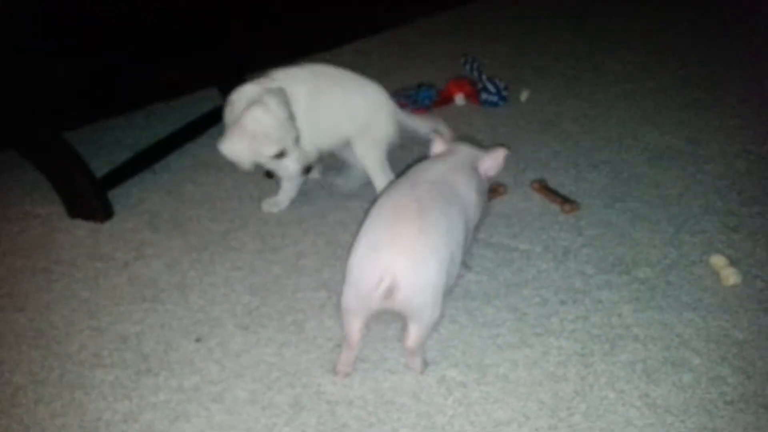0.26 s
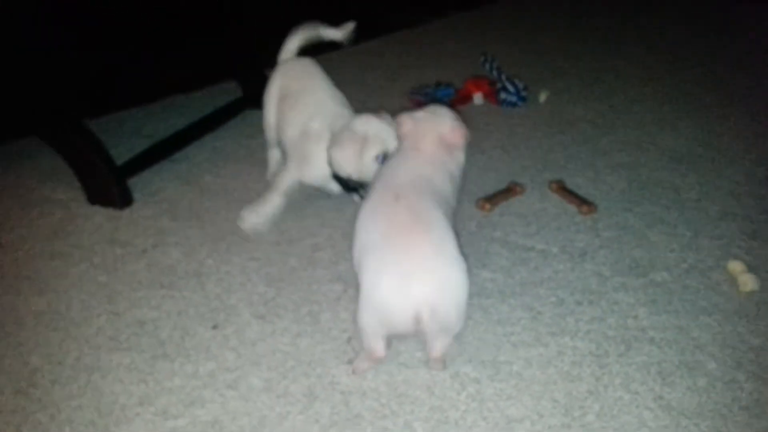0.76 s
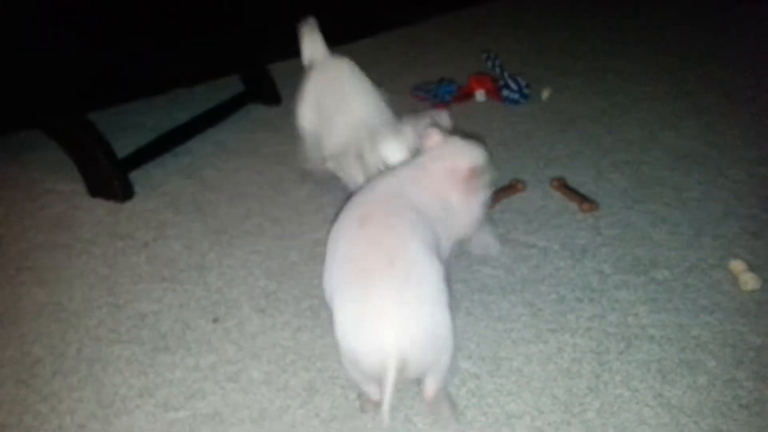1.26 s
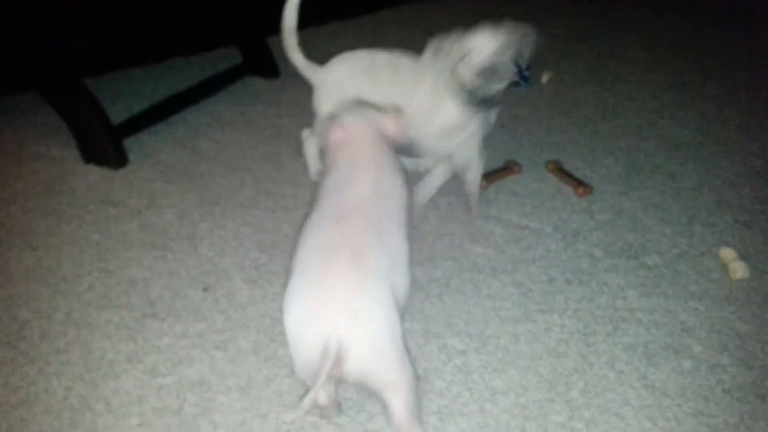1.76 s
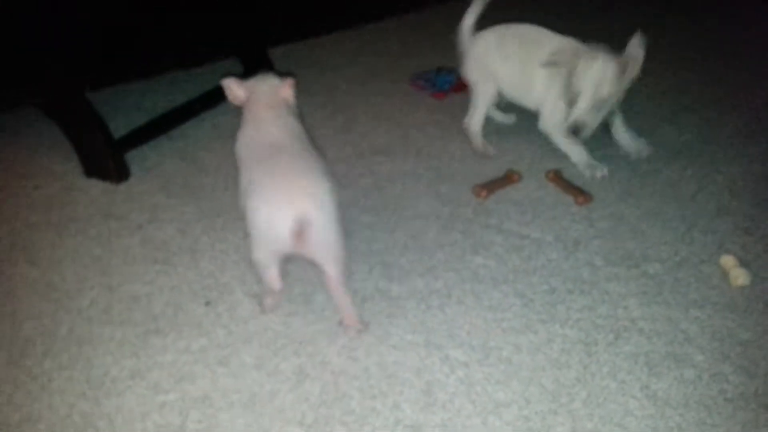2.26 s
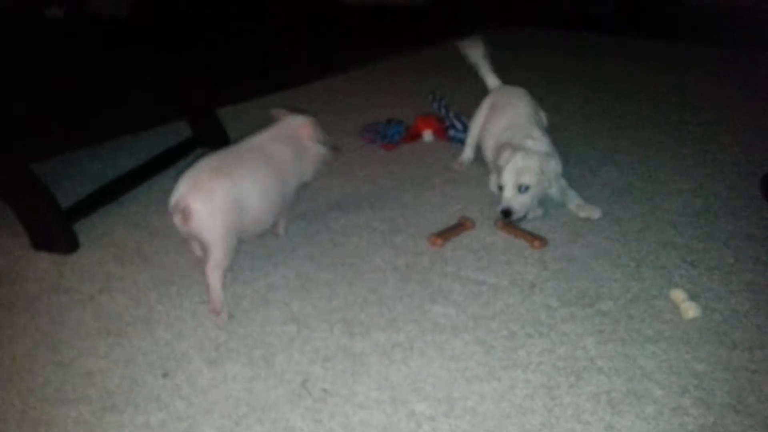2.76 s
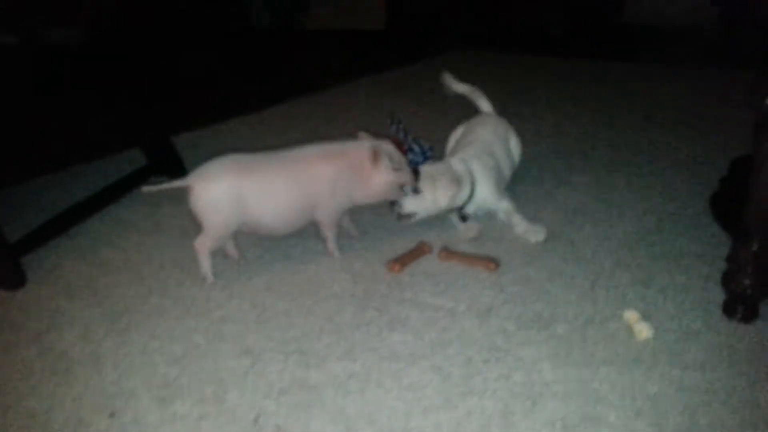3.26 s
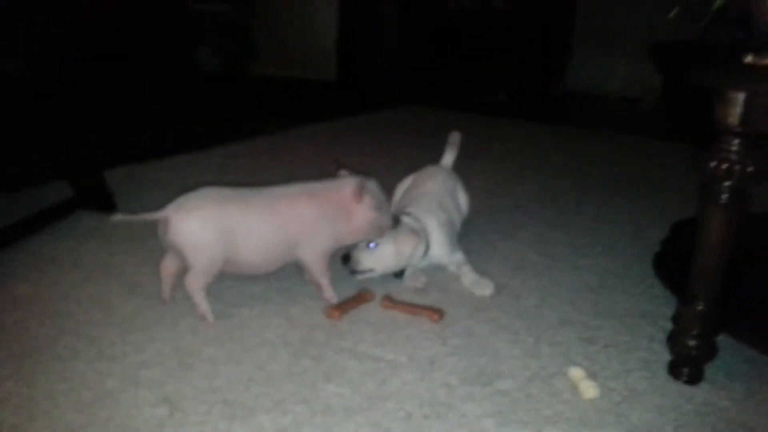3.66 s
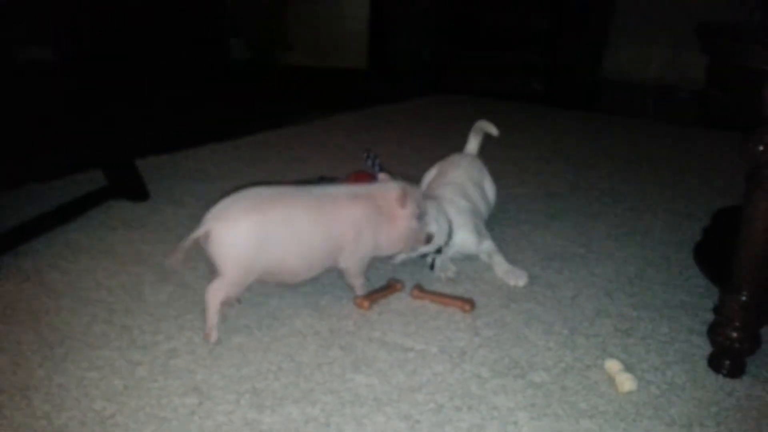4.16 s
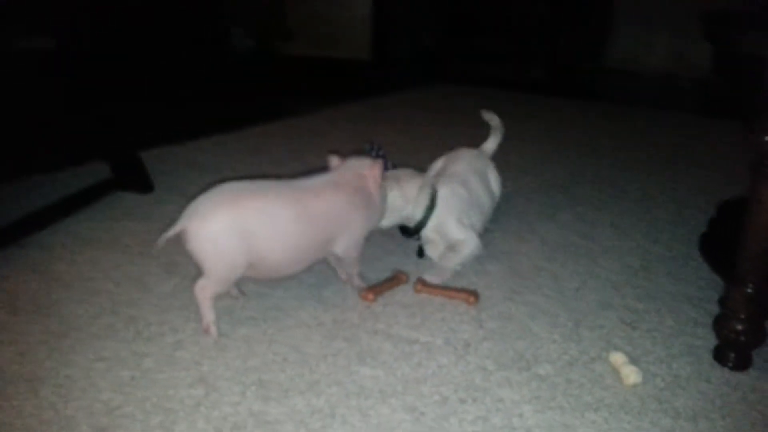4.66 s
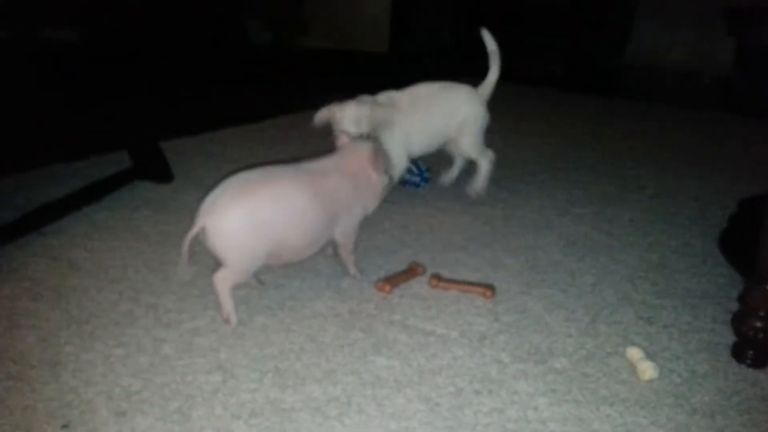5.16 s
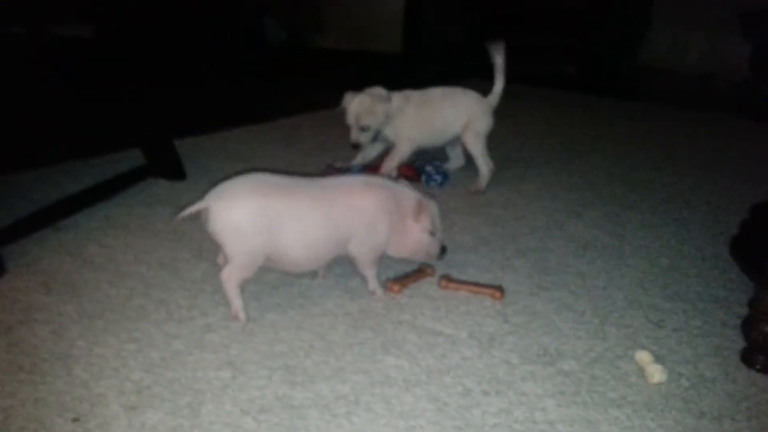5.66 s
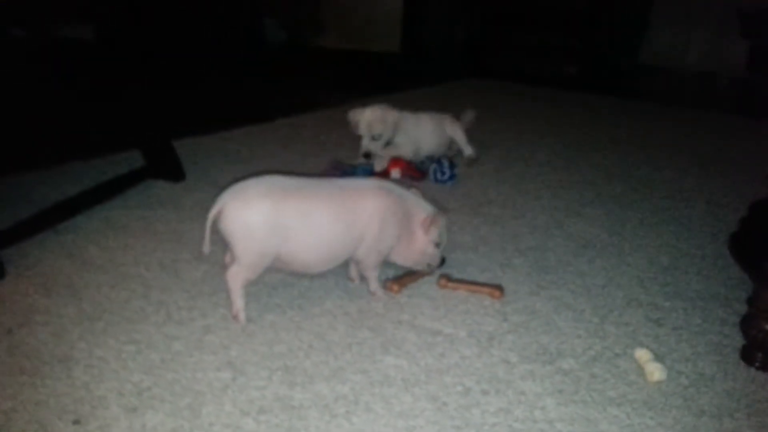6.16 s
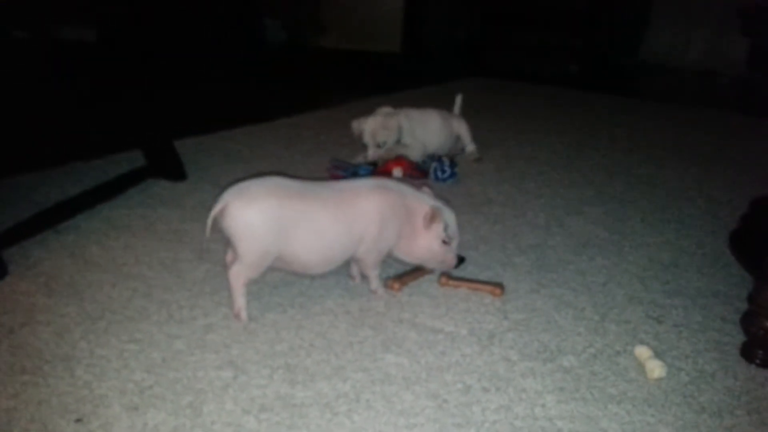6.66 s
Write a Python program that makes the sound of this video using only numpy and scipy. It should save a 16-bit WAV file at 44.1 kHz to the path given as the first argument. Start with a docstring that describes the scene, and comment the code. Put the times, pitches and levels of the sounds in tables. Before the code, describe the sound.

Small metal collar tags jingle in quick bright bursts, mostly on the right, over soft paw thuds and carpet rustle in a quiet room.

```python
"""Jingling tags in an animal scuffle

A piglet and a puppy scuffle on a carpet in a quiet living room.
Metal tags jingle in bursts to the right: decaying modes, chattering touches and noisy scraping.
Paws, fur and carpet are shaped noise; trotters and bumps of the hand-held camera ring low modes.
Light clicks and a few dry snaps are short noise bursts; an appliance hums as a wavering sine.
"""
import sys
import numpy as np
from scipy import signal
from scipy.fft import rfft, irfft, next_fast_len
from scipy.io import wavfile
from scipy.ndimage import uniform_filter1d, map_coordinates

SR = 44100
rng = np.random.default_rng(int(sys.argv[2]) if len(sys.argv) > 2 else 0)


def inscribe(sig):
    """Save sig as 16-bit PCM at rate SR to the path in sys.argv[1].

    A 1-D sig is mono; a 2-D sig holds one channel per row.
    Samples are clipped to [-1, 1] before scaling.
    """
    pcm = np.round(np.clip(np.atleast_2d(sig).T, -1, 1) * 32767)
    wavfile.write(sys.argv[1], SR, pcm.astype(np.int16))


N = 304334

# Hard contacts of the tags; the spot struck decides which modes ring. Levels precede the source gains:
# (time [s], main tone level [dB], tick level [dB], middle overtone level [dB], top overtone level [dB])
TAG_CONTACTS = [(0.0245, -50.5, -56, -61, -63), (0.513, -40.5, -47.5, -49, -54),
                (0.608, -37.5, -61, -62, -50), (0.6225, -26.5, -52, -59, -42), (0.642, -39, -56, -60, -56),
                (0.661, -40, -66, -62, -58), (0.7265, -40.5, -57, -53, -61), (0.8235, -42, -53.5, -52, -66),
                (0.872, -43, -59, -56, -52), (0.885, -43, -44, -46, -60.5), (0.898, -57, -44.5, -49, -61.5),
                (0.9519, -44, -51.5, -52, -65), (0.9825, -45, -56.5, -54, -55), (1.111, -45, -61, -63, -72),
                (1.1946, -34.5, -44, -63, -67), (1.27, -38, -53, -61, -62), (1.327, -32, -41.5, -46, -35.5),
                (1.36, -39, -55, -58, -43), (1.407, -34, -58, -60, -60), (1.417, -34, -38.5, -53, -41),
                (1.432, -41, -46, -55, -44), (1.6276, -62, -51.5, -67, -66), (1.681, -48, -58.5, -59, -65),
                (1.75, -36.5, -52, -62, -56), (1.773, -44, -43.5, -43.5, -43),
                (1.861, -28, -34, -28.5, -43), (1.8768, -27, -50, -38, -48),
                (1.919, -32.5, -49.5, -42, -53), (1.942, -36, -46, -49, -57),
                (2.0089, -34.5, -51.5, -58, -60.5), (2.035, -35.5, -58.5, -60, -47.5),
                (2.191, -40.5, -60.5, -66.5, -63), (2.245, -44, -57.5, -46.5, -58),
                (2.256, -38.5, -46, -51, -52), (2.283, -38.5, -52, -54, -51.5),
                (2.313, -18.5, -43, -50.5, -43.5), (2.3264, -23.5, -42.5, -48, -36),
                (2.342, -29, -52, -41, -39.5), (2.374, -20, -51.5, -45, -52.5),
                (2.3969, -24, -37, -37, -32.5), (2.4041, -22.5, -37, -41, -34.5),
                (2.428, -40.5, -51, -42, -55.5), (2.447, -26, -49, -37, -45),
                (2.4802, -25, -53.5, -45, -60), (2.6378, -50, -48.5, -66, -67),
                (2.7252, -48, -56, -64, -66), (3.192, -43, -60, -54.5, -58),
                (4.4703, -44.5, -63.5, -56, -57), (5.045, -30, -60, -48, -51),
                (5.055, -30.5, -46.5, -46, -54), (5.085, -42, -60, -55, -51),
                (5.112, -37.5, -66.5, -59, -57), (5.175, -42, -61, -59, -68),
                (5.285, -41.5, -58.5, -48, -68), (5.5058, -30, -50, -48, -46), (5.537, -24, -59, -44, -47),
                (5.638, -36, -51, -44, -61), (5.774, -36.5, -72, -52, -62), (5.9742, -56, -62.5, -61, -70)]


def amp(db):
    """Amplitude gain is ten to the power of decibels over twenty."""
    return 10 ** (np.asarray(db) / 20)


def unit(x):
    """Normalisation: division by the root mean square gives rms 1."""
    return x / np.sqrt(np.mean(x ** 2) + 1e-20)


def along(points, hz):
    """Linear interpolation of (Hz, value) points on a logarithmic frequency axis."""
    f, v = np.transpose(points)
    return np.interp(np.log(hz + 1), np.log(f + 1), v)


def wobble(rate):
    """Slow random modulation: a spline through random knots, rate of them a second."""
    knots = rng.standard_normal(int(N * rate / SR) + 4)
    return map_coordinates(knots, [np.arange(N) * rate / SR])


def filtered(x, response):
    """Linear filtering: the spectrum is multiplied by a response of frequency."""
    n = x.shape[-1]
    m = next_fast_len(n + 4096)
    return irfft(rfft(x, m) * response(np.fft.rfftfreq(m, 1 / SR)), m)[..., :n]


def noise(spectrum, shape):
    """Coloured noise: white noise through a spectral envelope, scaled to rms 1."""
    white = rng.standard_normal(shape)
    return unit(filtered(white, lambda hz: amp(along(spectrum, hz))))


def spread(pair):
    """Interchannel coherence: two unrelated signals mix to left and right, most alike in the bass."""
    # left-right likeness of the room's sound: (frequency [Hz], coherence [0-1])
    coherence = [(40, 0.75), (130, 0.97), (300, 0.89), (700, 0.23), (1500, 0.073), (8000, 0.22)]

    def mid_side_gains(hz):
        angle = np.arccos(np.clip(along(coherence, hz), -1, 1)) / 2
        return np.array([np.cos(angle), np.sin(angle)])

    mid, side = filtered(pair, mid_side_gains)
    return np.array([mid + side, mid - side])


def add(track, s, sound):
    """Superposition: a sound is summed into a track from time s."""
    part = track[..., max(round(s * SR), 0):][..., :sound.shape[-1]]
    part += sound[..., :part.shape[-1]]


def bursts(hits, spectrum, attack, t60):
    """Transient excitation: each (s, dB) hit is a stereo noise burst with exponential onset and decay."""
    out, t = np.zeros((2, N)), np.arange(SR // 4) / SR
    envelope = (1 - np.exp(-t / attack)) * amp(-60 * t / t60)
    envelope_rms = np.sqrt(np.mean(envelope ** 2)) / envelope.max()
    for s, db in hits:
        burst = unit(noise(spectrum, (2, len(t))) * envelope) * envelope_rms
        add(out, s, amp(db) * burst)
    return spread(out)


def knocks(hits, modes, attack):
    """Modal response: a soft blow, (s, dB), excites a few decaying low modes."""
    out, t = np.zeros(N), np.arange(SR // 5) / SR
    ringing = sum(amp(db - 60 * t / t60) * np.sin(2 * np.pi * hz * t) for hz, db, t60 in modes)
    knock = ringing * (1 - np.exp(-t / attack))
    for s, db in hits:
        add(out, s, amp(db) * knock)
    return out


def patchy(x, depth_db, size=7):
    """Spectral fluctuation: the colour of a rubbing sound shifts from one contact to the next."""
    z = signal.stft(x, nperseg=256)[2]
    across_frequency = uniform_filter1d(rng.standard_normal(z.shape), size, 0)
    field = uniform_filter1d(across_frequency, size, 1)
    return unit(signal.istft(z * amp(depth_db * unit(field)), nperseg=256)[1][:N])


def boom(x):
    """Room resonance: parallel band-pass modes add to the direct low sound."""
    # low resonances of the room: (centre [Hz], width [Hz], peak of the added band [dB re direct])
    resonances = [(122.4, 21.3, 0.5), (220.4, 6.8, 5.5), (261.7, 7.01, 1.5), (327, 17, -4)]

    def response(hz):
        return 1 + sum(amp(db) * 1j * hz * width / (centre ** 2 - hz ** 2 + 1j * hz * width)
                       for centre, width, db in resonances)

    return filtered(x, response)


def room(x, count=23):
    """Reverberation: convolution with decaying noise; the tails crossfade as the animals move about."""
    # reverberation time of the room: (frequency [Hz], t60 [s])
    decay_times = [(1000, 0.11), (7500, 0.13), (14000, 0.12)]
    out, centres = np.zeros((2, N)), np.linspace(0, N, count + 1)
    step = centres[1]
    for centre in centres:
        hz, t, z = signal.stft(rng.standard_normal((2, SR // 3)), SR, nperseg=256)
        decay = amp(-60 * t / along(decay_times, hz)[:, None]) * (1 - np.exp(-t / 0.0023))
        tail = signal.istft(z * decay, SR, nperseg=256)[1]
        i = np.arange(max(int(centre - step), 0), min(int(centre + step), N))
        piece = x[i] * np.cos(np.pi / 2 * (i - centre) / step)
        add(out, i[0] / SR, signal.fftconvolve(piece[None], tail / np.linalg.norm(tail[0]), axes=1))
    return out


def effort():
    """Energy summation: the powers of overlapping moves add to shaking, scraping and rustle gains."""
    # lunges, turns and shakes of the head; levels precede the source gains:
    # (time [s], length [s], tag shaking level [dB], tag scraping level [dB], rustle level [dB])
    moves = [(0.014, 0.016, -62, -73, -67), (0.09, 0.021, -68, -63, -70.5), (0.141, 0.011, -49.5, -81, -67),
             (0.479, 0.059, -52, -65.5, -64), (0.595, 0.05, -37, -53, -58), (0.7, 0.16, -48, -61, -66),
             (0.858, 0.052, -48, -50, -62), (0.93, 0.088, -63, -60.5, -69.5), (1.097, 0.037, -54, -57, -68),
             (1.185, 0.12, -42, -56, -63.5), (1.315, 0.1, -36, -51, -61.5),
             (1.411, 0.055, -40.5, -41.5, -58), (1.605, 0.091, -55, -63.5, -66.5),
             (1.741, 0.075, -42.5, -50.5, -61.5), (1.857, 0.17, -41, -53.5, -62.5),
             (1.985, 0.056, -49, -50, -63), (2.168, 0.15, -51, -63.5, -64.5),
             (2.303, 0.21, -35, -46.5, -61.5), (2.509, 0.15, -53, -79.5, -66.5),
             (2.702, 0.1, -54, -57.5, -67), (3.154, 0.061, -51, -63, -61), (3.592, 0.041, -74, -75, -66),
             (3.934, 0.053, -73, -64, -69.5), (4.389, 0.081, -64, -54, -66.5), (4.46, 0.016, -61, -63, -65),
             (5.029, 0.1, -42.5, -64, -64.5), (5.156, 0.14, -57, -56, -67.5),
             (5.236, 0.11, -47.5, -59.5, -63.5), (5.481, 0.086, -42, -53.5, -62),
             (5.583, 0.063, -42, -63, -62.5), (5.707, 0.1, -44, -60.5, -65.5),
             (5.96, 0.041, -45.5, -60.5, -65.5), (6.048, 0.098, -51, -68, -69.5),
             (6.392, 0.013, -51, -60.5, -69), (6.434, 0.11, -55.5, -79, -76),
             (6.789, 0.021, -74.5, -63.5, -66.5)]
    # the animals are never quite still: tag shaking, tag scraping, rustle [dB]
    rest_db = [-92.5, -94, -81.5]
    # a move builds up, flags a little while it lasts, then dies away
    attack_s, sag_db_per_s, release_db_per_s = 0.018, 6.5, 201
    t = np.arange(SR) / SR
    power = np.zeros((3, N)) + amp(rest_db)[:, None] ** 2
    for s, length, *db in moves:
        fall_db = sag_db_per_s * t + release_db_per_s * np.maximum(t - length, 0)
        gain = amp(db)[:, None] * np.minimum(t / attack_s, 1) * amp(-fall_db)
        add(power, s, gain ** 2)
    return np.sqrt(power)


def background(air_db=-67, waver=0.53):
    """Stationary sound: resonant room noise and a faint phase-modulated appliance hum."""
    # spectrum of the room air: (frequency [Hz], relative level [dB])
    air_spectrum = [(15, -53.5), (25, -20), (44, -6), (124, -6.5), (175, -6.5), (340, -0.5), (627, -9.5),
                    (1770, -22.5), (5000, -26.5), (7650, -28), (9470, -33), (13400, -25.5), (14500, -51)]
    hum_hz, hum_db = 117.4, -74  # mean pitch, rms level
    phase = 2 * np.pi * hum_hz * np.arange(N) / SR + waver * wobble(1.7)  # radians
    hum = amp(hum_db) * np.sqrt(2) * np.sin(phase)
    return hum + amp(air_db) * boom(spread(noise(air_spectrum, (2, N))))


def handling(left_db=-10, right_db=3):
    """Structure-borne sound: slips of the fingers and dull knocks, stronger at the right port."""
    # the hand knocks the camera body: (time [s], level before the port gain [dB])
    bumps = [(0.2915, -33.5), (0.3445, -35.5)]
    # the camera body's modes: (frequency [Hz], relative level [dB], t60 [s])
    case_modes = [(58, -8, .1), (96, 0, .095), (140, -8, .05)]
    # the fingers slip on the camera: (time [s], level before the port gain [dB])
    slips = [(.276, -51), (.299, -49.5), (.341, -52.5)]
    # spectrum of a slip: (frequency [Hz], relative level [dB])
    slip_spectrum = [(60, -1), (330, -1.5), (600, -13.5), (1600, -24.5), (5000, -39)]
    thumps = knocks(bumps, case_modes, attack=0.006)
    slides = bursts(slips, slip_spectrum, attack=0.0048, t60=0.19)
    return amp([[left_db], [right_db]]) * (thumps + slides)


def snap(echo_db=-9.0, echo_delay=0.0093):
    """Reflection: a dry snap across the room is followed by a softer, delayed echo from the walls."""
    # dry snaps: (time [s], level [dB])
    snaps = [(0.622, -51.5), (3.1935, -57), (5.268, -39.5)]
    # spectrum of a snap: (frequency [Hz], relative level [dB])
    snap_spectrum = [(500, -22), (1500, -16), (2100, -13), (2500, -1), (3400, -4.5), (4600, -9.5),
                     (6000, -28), (14000, -26)]
    late = [(s + echo_delay, db + echo_db) for s, db in snaps]
    direct = bursts(snaps, snap_spectrum, attack=0.000175, t60=0.046)
    return direct + bursts(late, snap_spectrum, attack=0.0044, t60=0.16)


def clicks(level_db=0, left_db=-3, tail_db=-16):
    """Impact of small hard things near the floor: a short click and a faint answer from the walls."""
    # light dry clicks, perhaps teeth and claws: (time [s], level at the right port [dB])
    contacts = [(.156, -47), (.51, -49), (2.632, -46), (2.782, -41.5), (3.162, -44.5), (3.1895, -44),
                (3.1932, -36.5), (3.624, -55.5), (4.47, -46), (5.868, -46.5), (6.06, -52), (6.072, -46),
                (6.448, -42), (6.638, -61), (6.8055, -47.5)]
    # spectrum of a click: (frequency [Hz], relative level [dB])
    click_spectrum = [(800, -29), (2500, -6), (4500, -1.5), (7000, 7.5), (9500, 7), (12000, -3),
                      (14500, -16)]
    direct = bursts(contacts, click_spectrum, attack=0.0003, t60=0.013)
    tail = amp(tail_db) * bursts(contacts, click_spectrum, attack=0.01, t60=0.11)
    return amp([[level_db + left_db], [level_db]]) * (direct + tail)


def rustle(brushing, level_db=5.5, grain_db=-0.5, catch_db=-7, catch_rate=170):
    """Friction noise: fur and feet brush an uneven hiss, and claws crackle as they catch in the loops."""
    # spectrum of fur and carpet: (frequency [Hz], relative level [dB])
    rustle_spectrum = [(100, -27), (400, 3), (900, 1.5), (1600, -0.5), (3000, -1), (6000, -0.5),
                       (10000, -2.5), (14500, -4.5)]
    hiss = np.array([patchy(side, 2.5, size=4) for side in noise(rustle_spectrum, (2, N))])
    # catch_rate is catches a second in each channel
    catches = (rng.random((2, N)) < catch_rate / SR) * rng.standard_normal((2, N))
    t = np.arange(SR // 200) / SR
    envelope = signal.fftconvolve(catches, amp(-60 * t / 0.0037)[None], axes=1)[:, :N]
    crackles = envelope * noise(rustle_spectrum, (2, N))
    rubbing = spread(hiss + amp(catch_db) * unit(crackles))
    return brushing * amp(level_db + grain_db * wobble(140)) * rubbing


def trotters():
    """Modal response of the floor: a hard step rings it in one compact knock."""
    # hard steps, probably the trotters, that knock through the carpet: (time [s], relative level [dB])
    hard_steps = [(0.575, -60), (1.21, -49), (3.566, -52), (4.1227, -41), (4.135, -52), (6.491, -55)]
    # the floor's modes: (frequency [Hz], relative level [dB], t60 [s])
    floor_modes = [(185, -2, .07), (380, -3, .045), (560, -1, .035)]
    return knocks(hard_steps, floor_modes, attack=0.0013)


def paws(brushing, thud_db=-6, linger_db=-15, scuff_db=-1, shuffle_db=-74, weight_db=3, lump_db=2):
    """Soft impact: footfalls thud, linger and scuff; lighter steps blur into a shuffle with every move."""
    # footfalls, levels before the source gains: (time [s], thud level [dB], scuff level [dB])
    footfalls = [(0.021, -53, -70), (0.121, -46.5, -64.5), (.408, -52, -69), (.571, -45, -56.5),
                 (0.62, -50.5, -58.5), (.738, -49.5, -59), (0.974, -51, -69), (1.093, -46.5, -59),
                 (1.201, -47, -60.5), (1.326, -49, -54), (1.378, -47, -65), (1.42, -51, -66),
                 (1.858, -46.5, -54), (1.886, -52, -65), (2.107, -46.5, -61), (2.301, -43, -58.5),
                 (2.346, -43, -75), (2.388, -42, -55), (2.451, -44, -57.5), (2.629, -49.5, -60),
                 (3.051, -49.5, -64), (3.176, -48, -77), (3.351, -47, -64), (3.479, -49.5, -58.5),
                 (3.564, -45, -59), (3.658, -47, -68.5), (3.699, -50, -65), (4.074, -49, -64),
                 (4.122, -49, -60), (4.395, -47, -63.5), (4.456, -54, -64.5), (4.519, -48.5, -61),
                 (4.66, -46, -64), (4.787, -43.5, -57.5), (4.944, -46.5, -61.5), (5.049, -51, -57.5),
                 (5.28, -49, -64), (5.445, -50.5, -67.5), (5.502, -45.5, -59), (5.631, -47, -63),
                 (5.827, -50, -72.5), (6.068, -48.5, -60.5), (6.113, -50, -69), (6.156, -54.5, -61),
                 (6.454, -51, -64), (6.484, -43.5, -62), (6.542, -53, -64.5), (6.716, -50, -66)]
    # spectrum of a thud: (frequency [Hz], relative level [dB])
    thud_spectrum = [(30, -35.5), (60, -3.5), (95, 3.5), (120, 4.5), (160, 1.5), (330, -1.5), (500, -6.5),
                     (800, -27), (1500, -29.5), (4000, -67.5)]
    # spectrum of a scuff: (frequency [Hz], relative level [dB])
    scuff_spectrum = [(100, -27), (400, -2.5), (750, -8), (1300, -15), (3000, -22.5), (10000, -25.5)]
    steps = [(s, db) for s, db, _ in footfalls]
    thuds = amp(thud_db) * bursts(steps, thud_spectrum, attack=0.00093, t60=0.073)
    thuds += amp(linger_db) * bursts(steps, thud_spectrum, attack=0.011, t60=0.4)
    scrapes = [(s, db + scuff_db) for s, _, db in footfalls]
    scuffs = bursts(scrapes, scuff_spectrum, attack=0.008, t60=0.198)
    shuffle = spread(noise(thud_spectrum, (2, N))) * unit(amp(lump_db * wobble(30)))
    shuffle_gain = np.hypot(amp(shuffle_db), amp(weight_db) * brushing)
    return boom(thuds + shuffle_gain * shuffle) + scuffs


def ring(levels_db, attack):
    """Modal synthesis: a stroke rings three groups of modes; touching a neighbour shifts their pitch."""
    # the tags' modes: (frequency [Hz], level within its group [dB], t60 [s])
    metal_modes = [(7000, -20, .03), (7155, -20, .035), (7295, -16, .045), (7532, -3, .06), (7560, 0, .09),
                   (7655, -12, .05), (7837, -17, .035), (7962, -20, .03), (8668, -28, .2), (9300, -22, .03),
                   (9480, -19, .035), (9890, -21, .05), (10512, -17, .08), (12590, -28, .06),
                   (13400, -37, .06)]
    # where the middle and the top overtones begin [Hz]
    group_edges = [8200, 10200]
    scatter_db, detune = 3.5, 0.002  # random share of energy among modes, random relative pitch shift
    hz, db, t60 = np.transpose(metal_modes)[:, :, None]
    t = np.arange(SR // 5) / SR
    group = np.searchsorted(group_edges, hz[:, 0])
    size = amp(db + scatter_db * rng.standard_normal(hz.shape))
    pitch = hz * (1 + detune * rng.standard_normal(hz.shape))
    phase = rng.random() + rng.random(hz.shape) / 3  # cycles
    modes = size * amp(-60 * t / t60) * np.sin(2 * np.pi * (pitch * t + phase))
    groups = np.array([modes[group == k].sum(axis=0) for k in range(len(levels_db))])
    early_rms = groups[:, t < .02].std(axis=1)
    return (amp(levels_db) / early_rms) @ groups * (1 - np.exp(-t / attack))


def strokes():
    """Contact damping: each hard contact damps the ring of those before it and starts its own."""
    out, t = np.zeros(N), np.arange(SR // 5) / SR
    choke = amp(-5 * np.minimum(t / 0.002, 1))  # 5 dB down within 2 ms
    for s, main, _, middle, top in TAG_CONTACTS:
        ringing = out[max(round(s * SR), 0):][:len(t)]
        add(out, s, ringing * (choke[:len(ringing)] - 1))
        add(out, s, ring([main, middle, top], attack=0.00073))
    return out


def chatter(rate=130, middle_db=-19, top_db=-18, count=14):
    """Random impacts: light touches on several spots, each with its own ring, keep an even strength."""
    # rate is touches a second over all spots; their strengths scatter by 6 dB
    strength = amp(6 * np.clip(rng.standard_normal((count, N)), -2, 2))
    touches = (rng.random((count, N)) < rate / count / SR) * strength
    rings = [ring([0, middle_db, top_db], attack=.0001) for _ in touches]
    jingle = signal.fftconvolve(touches, np.array(rings), axes=1).sum(axis=0)[:N]
    running_power = np.abs(uniform_filter1d(jingle ** 2, SR // 20))
    return jingle / np.sqrt(running_power + jingle.var() / 20)


def clinks(t60=0.016, count=5):
    """Heavily damped modes: the holding ring gives a few close tones, gone in a moment."""
    # clinks of the ring that holds the tags; the pitch depends on where it is hit:
    # (time [s], central pitch [Hz], relative level [dB])
    ring_hits = [(1.433, 5450, -27.5), (1.773, 6450, -35.5), (1.941, 6350, -41), (2.211, 6700, -43.5),
                 (2.397, 5190, -38), (5.9742, 6450, -38.5)]
    out, t = np.zeros(N), np.arange(SR // 20) / SR
    for s, hz, db in ring_hits:
        pitch = hz * (1 + .06 * rng.standard_normal((count, 1)))
        tones = np.sin(2 * np.pi * (pitch * t + rng.random((count, 1)))).sum(axis=0)
        add(out, s, amp(db - 60 * t / t60) * unit(tones) / 2)
    return out


def tags(shaking, scraping, scrape_db=-3, grit_db=4, ring_db=-9.0, tick_db=10, wet_db=-8,
         tick_wet_db=-9, free_db=-48, damping=1.0):
    """Impact and friction: hard contacts ring the tags, light ones chatter, rims scrape on their ring."""
    # spectrum of metal sliding on metal: (frequency [Hz], relative level [dB])
    scrape_spectrum = [(800, -49.5), (3000, -19), (5000, -6.5), (6300, -4.5), (7200, 3.5), (8000, -2),
                       (8900, -8.5), (9600, -8), (11200, -12.5), (14500, -11.5)]
    # spectrum of a tick: (frequency [Hz], relative level [dB])
    tick_spectrum = [(800, -34), (2500, -14), (4500, -6.5), (6300, 0), (7200, 17.5), (8000, 8.5),
                     (8800, -14.5), (9700, -5), (11000, -6.5), (14500, -5)]
    # how the tags reach the left port: (frequency [Hz], gain [dB])
    shadow = [(2000, -9), (5000, -28.5), (7500, -21), (8700, -21.5), (10000, -13.5), (14000, -14.5)]
    # barely shaken tags lie against the fur, which damps their tone
    freedom = np.minimum(shaking / amp(free_db), 1) ** damping
    rings = amp(-10) * shaking * freedom * chatter()
    rings += amp(ring_db) * strokes()
    # metal sliding on metal is gritty, and every hard contact ticks
    grit = unit(amp(grit_db * wobble(420)) * patchy(noise(scrape_spectrum, N), 3))
    ticks = amp(scrape_db) * scraping * grit
    tick_hits = [(s, db) for s, _, db, *_ in TAG_CONTACTS]
    ticks += amp(tick_db) * bursts(tick_hits, tick_spectrum, attack=0.00015, t60=.013)[0]
    ticks += clinks()
    left, right = rings + ticks + room(amp(wet_db) * rings + amp(tick_wet_db) * ticks)
    return np.array([filtered(left, lambda hz: amp(along(shadow, hz))), right])


def scene():
    """Superposition of all sources at the two microphone ports."""
    shaking, scraping, brushing = effort()
    animals = tags(shaking, scraping) + rustle(brushing) + paws(brushing) + trotters()
    return animals + clicks() + snap() + handling() + background()


def record(dry):
    """Port delay, resonance and band limit: the left lags, the right resonates in the treble."""
    # the right port's resonance: (frequency [Hz], gain [dB])
    port = [(30, 2), (120, 2), (300, 0), (3500, -0.5), (5500, 0.5), (7500, 7.5), (9500, 3), (14000, 0.5)]
    top_hz = 14650
    lag = 4 / SR  # seconds
    left = filtered(dry[0], lambda hz: np.exp(-2j * np.pi * hz * lag))
    right = filtered(dry[1], lambda hz: amp(along(port, hz)))
    return filtered(np.array([left, right]), lambda hz: hz < top_hz)


dry = scene()
out = record(dry)
inscribe(out)
```